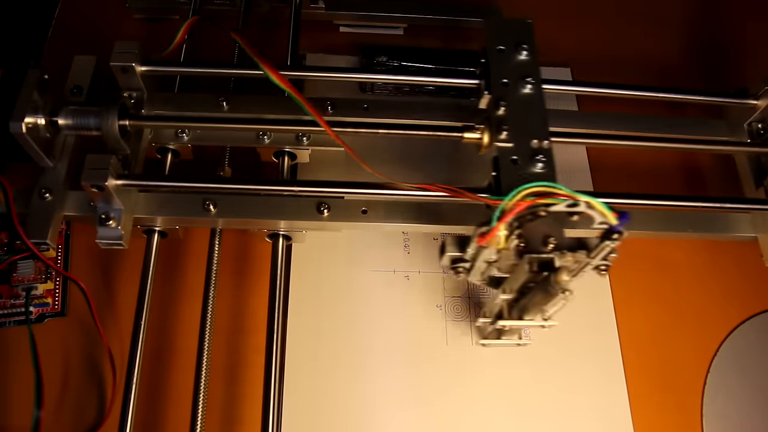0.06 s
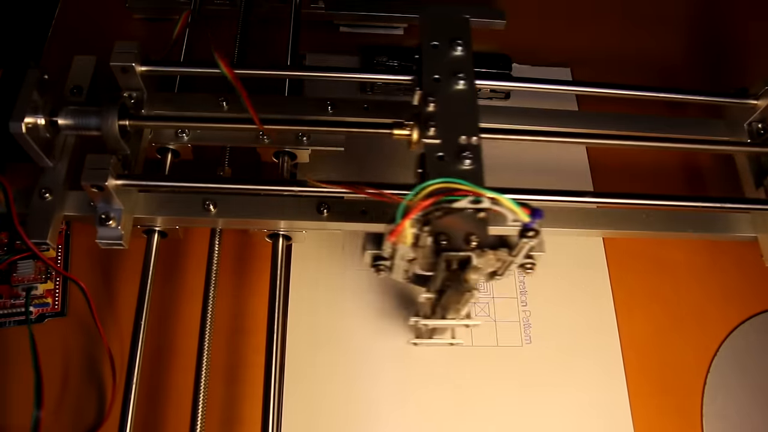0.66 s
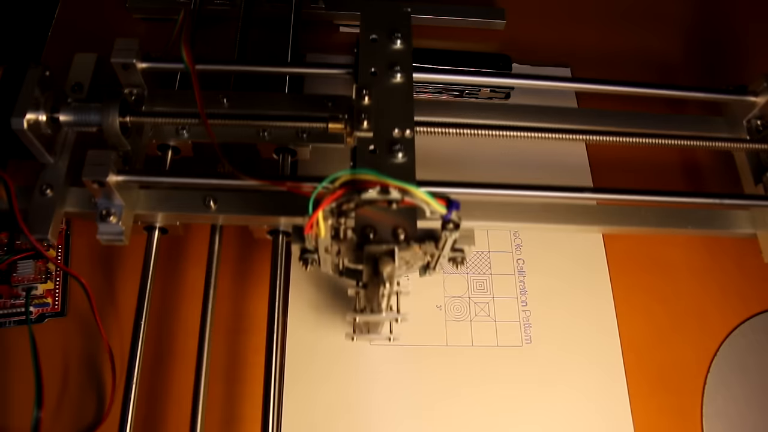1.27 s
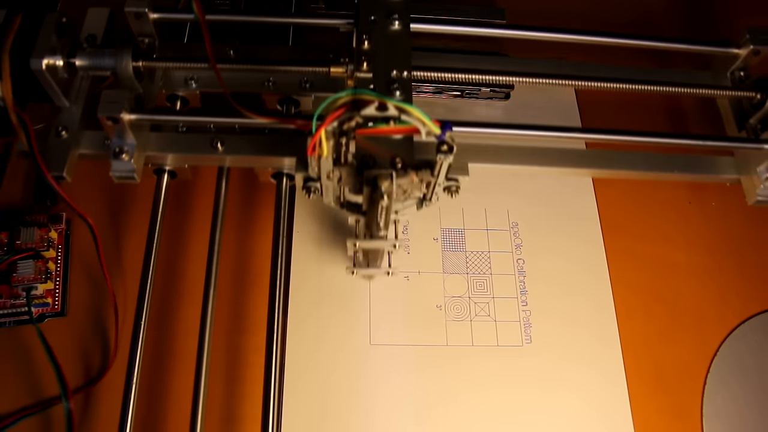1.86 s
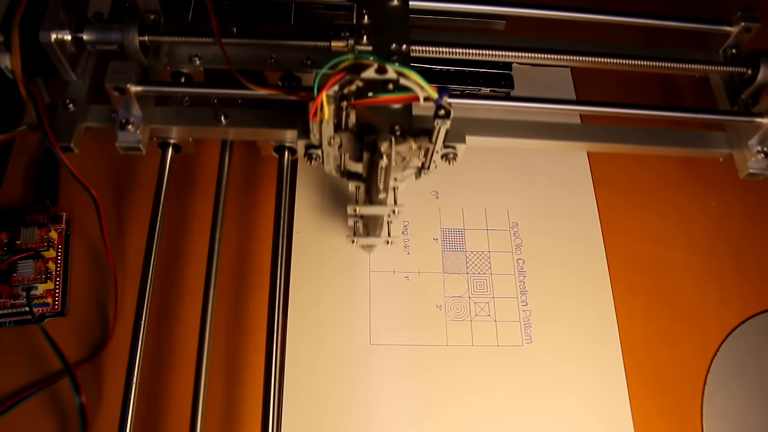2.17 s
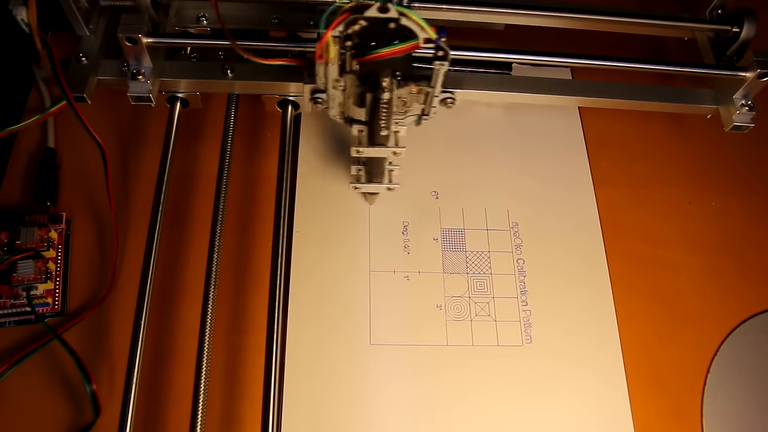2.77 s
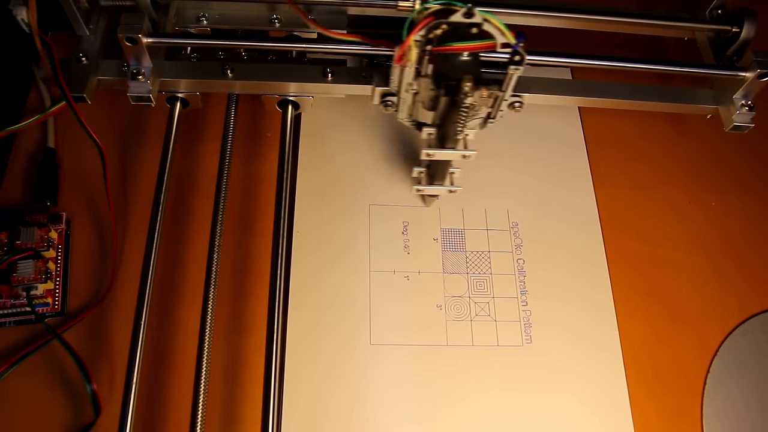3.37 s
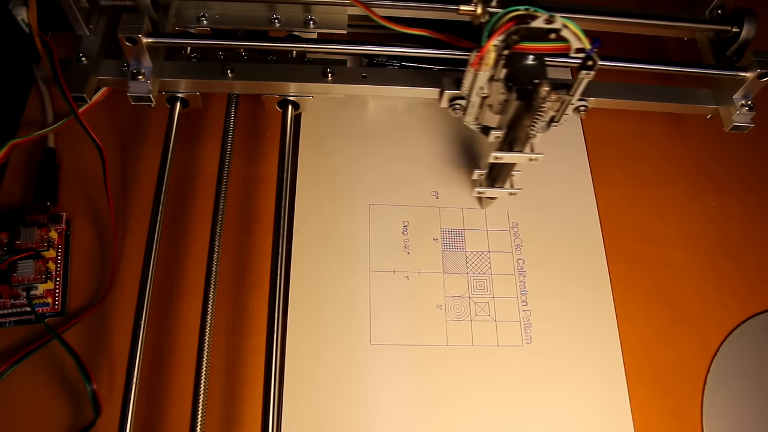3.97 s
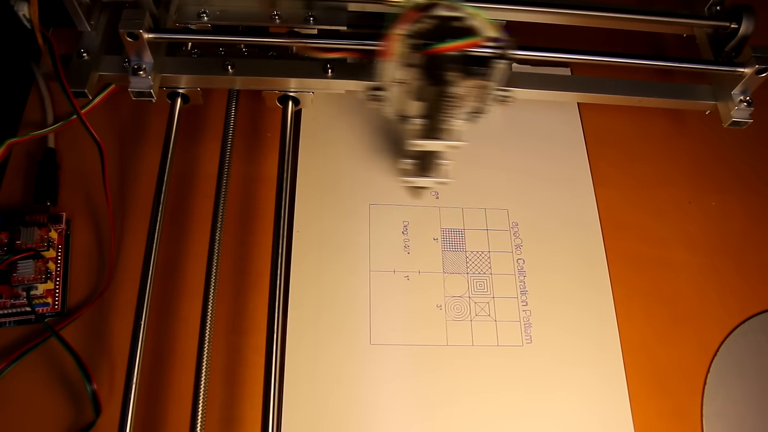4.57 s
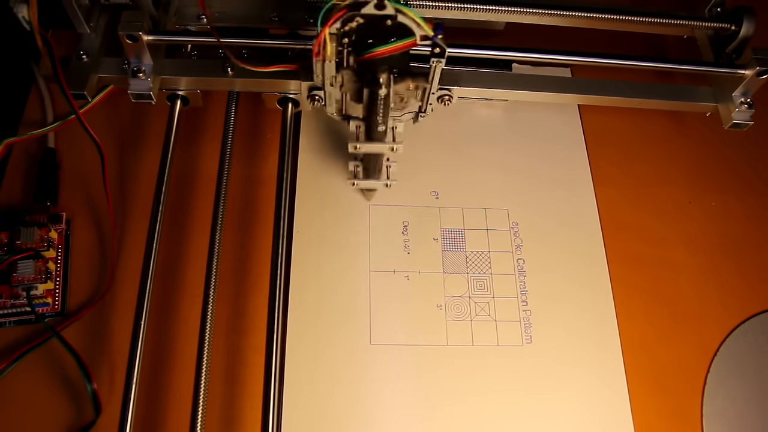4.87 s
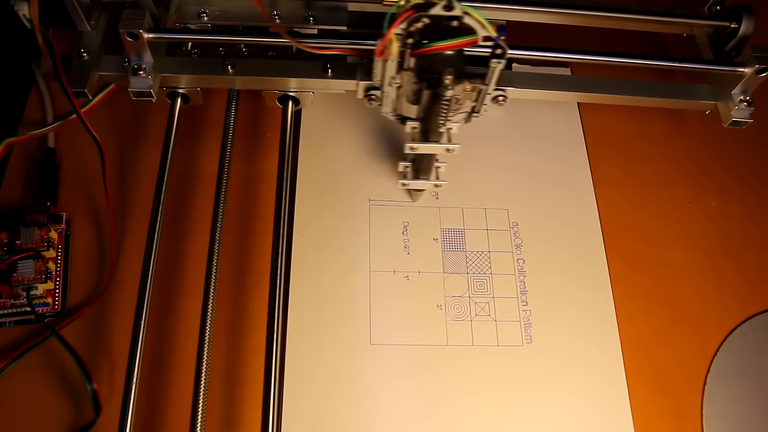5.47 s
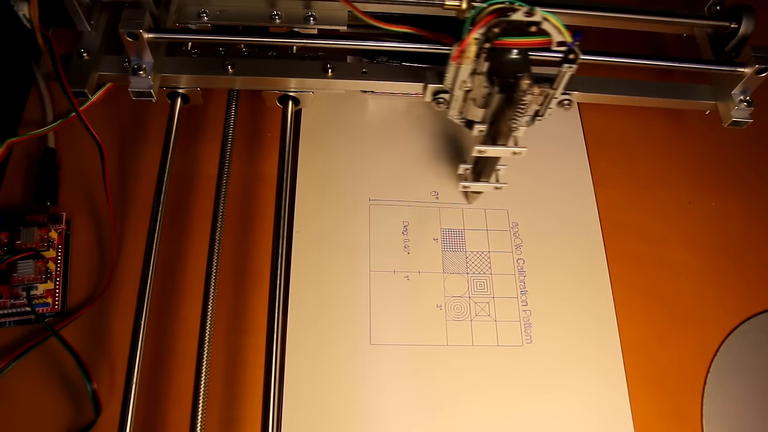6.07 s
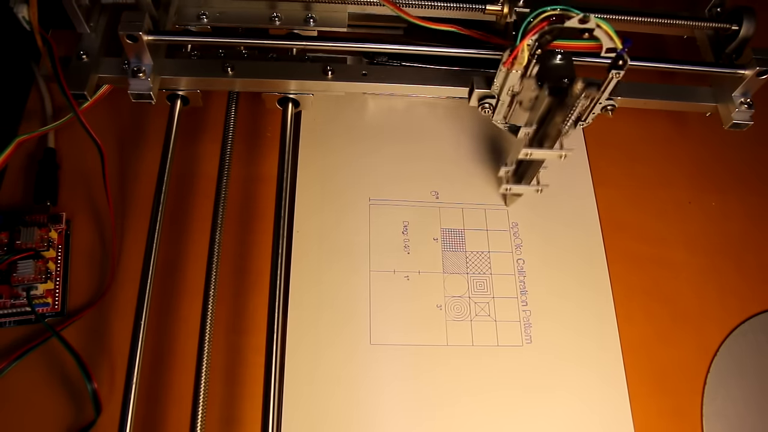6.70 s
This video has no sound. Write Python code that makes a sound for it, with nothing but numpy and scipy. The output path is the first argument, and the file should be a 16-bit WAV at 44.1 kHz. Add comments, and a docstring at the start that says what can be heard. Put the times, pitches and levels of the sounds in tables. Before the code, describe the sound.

Close up, the stepper motors of a small plotter on a bench whine through a series of moves. A fluttering carriage whine gives way to a duller screw chatter with a faint rising whistle. Another steady stroke leads into a fast, higher whirring run, short jogging blips and a final slow stroke. Starts and stops chirp and lightly rattle the frame, while a low hum and soft hiss continue underneath.

```python
"""A small pen plotter on a bench, microphone close and centred, over a low hum and steady hiss. A stepper
motor slides the carriage left, whining on multiples of its step rate and throbbing as its shaft turns.
At 1.3 s a second motor chatters along the lead screw under a faint rising whistle. The carriage goes
right at 2.8 s, races back at 4.4 s and goes right again at 5.1 s; tiny jogs and a nudge of the screw
follow these last two. Starts and stops sweep the frame's resonances; the carriage's also rattle it."""
import sys
import numpy as np
from scipy.fft import rfft, irfft, next_fast_len
from scipy.io import wavfile
from scipy.ndimage import uniform_filter1d

SR = 44100
rng = np.random.default_rng(int(sys.argv[2]) if len(sys.argv) > 2 else 0)


def wav_out(sig):
    """Save sig, one row per channel (or a flat mono array), as 16-bit PCM at SR to the path in sys.argv[1]."""
    wavfile.write(sys.argv[1], SR, np.round(np.clip(np.atleast_2d(sig).T, -1, 1) * 32767).astype(np.int16))


N = 297234
T = np.arange(N) / SR

STEP_HZ, RAPID_HZ, RAPID_RAMP_S = 398.26, 1593.0, 0.091
STEPS_PER_THROB, TOP_HZ = 50, 15850
# carriage moves, in turn left, right, rapid left, right: (start [s], stop [s])
STROKES = [(-.1, 1.303), (2.811, 4.331), (4.361, 4.827), (5.054, 6.576)]
# sliding friction of a slow move: (frequency [Hz], relative density [dB])
SLIDING = [(100, -120), (300, -104), (800, -99.5), (1200, -94), (2200, -104), (4000, -108), (8000, -107),
           (11000, -113), (15000, -115)]


def amp(db):
    return 10 ** (np.asarray(db) / 20)


def unit(x):
    return x / np.sqrt(np.mean(np.abs(x) ** 2) + 1e-20)


def along(points, hz):
    """Read (frequency [Hz], value) points on a log frequency axis."""
    freqs, values = np.transpose(points)
    return np.interp(np.log(hz + 1), np.log(freqs), values)


def filtered(x, response):
    """Shape x by a frequency response."""
    size = next_fast_len(N + SR // 4)
    return irfft(rfft(x, size) * response(np.fft.rfftfreq(size, 1 / SR)), size)[..., :N]


def noise(spectrum):
    """Noise that follows (frequency [Hz], density [dB/Hz]) points."""
    return filtered(rng.standard_normal(N) * np.sqrt(SR / 2), lambda hz: amp(along(spectrum, hz)))


def waver(t, width_hz, steep, size=2048):
    """A complex random curve of rms about 1 whose spectrum falls off beyond width_hz."""
    hz = np.fft.fftfreq(size, 2 / size)
    white = rng.standard_normal(size) + 1j * rng.standard_normal(size)
    curve = np.fft.ifft(np.fft.fft(white) / (1 + (hz / width_hz) ** 2) ** steep)
    return np.interp(t - t[0], np.arange(size) * 2 / size, unit(curve))


def swell(at, width_s):
    """A bell-shaped envelope around a moment."""
    return np.exp(-np.minimum(((T - at) / width_s) ** 2, 100) / 2)


def blip(at, hz, db, width_s):
    """A tone that swells and fades around a moment."""
    return np.sqrt(2) * amp(db) * swell(at, width_s) * np.sin(2 * np.pi * hz * (T - at))


def steady_hiss():
    """Steady centred hiss; the two channels differ only very faintly, mostly in the treble."""
    # both: (frequency [Hz], density [dB/Hz])
    centre = [(20, -95.5), (60, -100), (200, -101), (450, -96.5), (1200, -100), (2000, -106), (4000, -109),
              (9000, -110), (15000, -113)]
    side = [(100, -135), (400, -118), (4000, -117), (9000, -118), (15000, -122)]
    return noise(centre), noise(side)


def hum(hz=152.98, skip_s=1.844):
    """A pure, steady hum that skips once by part of a cycle."""
    cycles = hz * T + 0.45 * (T > skip_s)
    return amp(-43.7) * np.sin(2 * np.pi * cycles)


def carriage():
    """The first motor drives three slow strokes along the rail and one rapid run back."""
    # motor lines: (multiple of the step rate, relative level [dB], flutter [0-1])
    left_lines = [(1.0, -58, 0.8), (2.0, -61, 0.9), (2.5, -60, 0.7), (3.0, -73, 0.9), (3.5, -67, 0.8),
                  (4.5, -69, 0.9), (5.0, -73, 0.9), (5.5, -76, 0.9), (6.0, -67, 0.9), (7.0, -59, 0.3),
                  (7.5, -76, 0.9), (9.0, -69, 0.7), (10.0, -75, 0.9), (11.0, -73, 0.9), (12.0, -75, 0.9),
                  (13.0, -77, 0.9), (15.0, -67, 0.8), (15.5, -77, 0.9), (17.0, -74, 0.8), (19.0, -77, 0.9),
                  (20.0, -78, 0.9), (20.5, -79, 0.9), (21.0, -73, 0.9), (22.0, -70, 0.9), (23.0, -56, 0.7),
                  (24.0, -71, 0.8), (29.0, -78, 0.9), (30.0, -71, 0.8), (32.0, -57, 0.8)]
    right_lines = [(2.5, -63.0, 0.7), (3.0, -73.0, 0.9), (4.0, -67.0, 0.8), (4.5, -69.0, 0.8),
                   (7.5, -79.0, 0.9), (8.5, -78.0, 0.9), (9.5, -75.0, 1.0), (10.0, -77.0, 0.9),
                   (11.0, -78.0, 0.9), (17.0, -72.0, 0.8), (18.0, -76.0, 0.9), (19.0, -80.0, 0.9),
                   (20.0, -77.0, 0.9), (21.0, -76.0, 0.9), (22.0, -72.0, 0.9), (22.5, -73.0, 0.9),
                   (23.5, -78.0, 0.9), (24.0, -69.0, 0.8), (25.0, -80.0, 0.9), (29.0, -76.0, 0.6),
                   (30.0, -72.0, 0.5), (35.0, -80.0, 0.7), (36.0, -79.0, 0.7), (37.0, -79.0, 0.7)]
    rapid_lines = [(0.5, -54, 0.3), (1.5, -61, 0.8), (2.5, -65, 0.9), (3.5, -64, 0.7), (4.0, -54, 0.8),
                   (4.5, -69, 0.7), (5.0, -64, 0.8), (5.5, -76, 0.9), (6.0, -63, 0.6), (6.5, -72, 0.9),
                   (7.0, -75, 0.7), (7.5, -73, 0.9), (8.0, -69, 0.8), (8.5, -76, 0.8), (9.0, -76, 0.8)]
    # multiples of the step rate that swell along the rail
    left_orders = (4, 8, 14, 16)
    right_orders = (2, 3.5, 5, 6, 7, 8, 9, 13, 14, 15, 16, 23, 32)
    rapid_orders = (2, 3)
    # a row for each: (relative level [dB], flutter [0-1], swing [dB], peak after start [s], period [s])
    left_swells = [(-61.5, 0.48, 3.5, .39, .82), (-62.5, 0.34, 3, .06, 0.87), (-68, 1, 6, 0.65, 1.1),
                   (-51, 0.23, 1, 0.11, 0.95)]
    right_swells = [(-56.5, 0.81, 2.8, 0.53, 2.3), (-69, 0.91, 4.2, 0.12, 0.93),
                    (-63, 0.34, 3.3, 0.46, 0.87), (-74, .8, 4.6, 1.0, 1.5), (-67, 0.55, 3.8, 0.61, 1.32),
                    (-67, 0.55, 5.6, 0.19, 0.87), (-65.5, 0.61, 2.9, 0.95, 1.4), (-68.5, .7, 3, 1.32, 0.68),
                    (-62.5, 0.42, 2.1, .71, 0.68), (-63.5, 0.85, 3.5, 1.33, 1.06),
                    (-57, 0.59, 3.2, 0.78, .86), (-58, 0.67, 0.98, 1.38, 0.77),
                    (-58.5, 0.87, 2.7, 1.04, 1.16)]
    rapid_swells = [(-52.5, 0.32, 6.1, 0.17, 0.26), (-59, 0.86, 4, 0.08, 0.53)]
    # step tone of each rightward stroke: (relative level [dB], flutter [0-1])
    right_tones = [(-58.8, 0), (-54.5, 0.13)]
    # step tone of the rapid run: (time [s], relative level [dB])
    rapid_tone = [(4.455, -43.5), (4.503, -39), (4.551, -37.5), (4.735, -37.5)]
    # friction of the rapid run: (frequency [Hz], relative density [dB])
    whirr = [(100, -120), (450, -89.5), (900, -99), (1500, -93.5), (3000, -101), (8000, -104),
             (13000, -102), (15500, -105)]

    leftward, rightward, run_back, right_again = STROKES
    lines = left_lines + rail_swells(left_orders, left_swells, leftward[0])
    out = stepper(*leftward, STEP_HZ, lines, ramp_s=0.023, whine_db=0.2, roughness=1.45, chatter=0.11,
                  buzz_db=-85.5, sweep_db=-51, rub=SLIDING, rub_db=-1)
    for stroke, (db, flutter) in zip([rightward, right_again], right_tones):
        lines = right_lines + rail_swells(right_orders, right_swells, stroke[0]) + step_tone(db, flutter)
        out += stepper(*stroke, STEP_HZ, lines, ramp_s=0.024, whine_db=-0.37, roughness=1, chatter=0.11,
                       buzz_db=-96, sweep_db=-45.5, rub=SLIDING, rub_db=-1)
    lines = rapid_lines + rail_swells(rapid_orders, rapid_swells, run_back[0])
    lines += step_tone(np.interp(T, *np.transpose(rapid_tone)), flutter=0.13)
    return out + stepper(*run_back, RAPID_HZ, lines, ramp_s=RAPID_RAMP_S, whine_db=-0.25, roughness=1.6,
                         chatter=0.66, buzz_db=-94, sweep_db=-38.5, rub=whirr, rub_db=0.5)


def rail_swells(orders, rows, start):
    """Standing waves in the rails make these lines swell and fade as the carriage passes."""
    return [(order, db + swing_db * np.cos(2 * np.pi * (T - start - peak_s) / period_s), flutter)
            for order, (db, flutter, swing_db, peak_s, period_s) in zip(orders, rows)]


def step_tone(db, flutter):
    """The line at the step rate itself, at a set level or along a level curve."""
    return [(1, db + np.zeros(N), flutter)]


def stepper(start, stop, cruise_hz, lines, ramp_s, whine_db, roughness, chatter,
            buzz_db, sweep_db, rub, rub_db):
    """One move: the step rate ramps up, cruises and ramps down; friction noise follows the speed."""
    speed = np.clip(np.minimum(T - start, stop - T) / ramp_s, 0, 1)
    moving = speed > 0
    t, pace = T[moving], speed[moving]
    steps = np.cumsum(pace) * cruise_hz / SR
    shaft = 2 * np.pi * steps / STEPS_PER_THROB
    # the load makes the rotor lead and lag a little
    angle = 2 * np.pi * steps + 0.011 * np.sin(shaft) + 0.0094 * waver(t, 2.8, steep=1).real
    whine = motor_whine(moving, angle, shaft, cruise_hz, lines, roughness, chatter)
    sweep = frame_sweep(cruise_hz * pace, angle, way=np.sign(start + stop - 2 * t))
    out = amp(rub_db) * speed * noise(rub)
    buzz = microstep_buzz(angle / 2, cruise_hz / 2)
    out[moving] += pace ** 20 * (amp(whine_db) * whine + amp(buzz_db) * buzz)  # only near full speed
    out[moving] += amp(sweep_db) * pace ** 1.63 * np.sqrt(1 - pace ** 4) * sweep  # only on the ramps
    return out


def motor_whine(moving, angle, shaft, cruise_hz, lines, roughness, chatter):
    """Tones on multiples of the step rate that flutter, and throb as the shaft turns."""
    # flutter heard as roughness and as throb: (frequency [Hz], share)
    random_share = [(400, 0.53), (800, 0.46), (1400, 0.42), (2500, 0.68), (6000, 0.5), (13000, 0.39)]
    throb_share = [(400, 0.057), (2500, 0.04), (5500, 0.33), (6400, 0.51), (9000, 0.44), (13000, 0.47)]
    # a chattering drive shakes the frame's middle range most: (frequency [Hz], share)
    chatter_share = [(400, 0.09), (600, 0.67), (1000, 0.65), (3000, 0.59), (13000, .5)]
    # sudden phase slips: (frequency [Hz], size at full flutter [rad])
    slip_size = [(400, 2.65), (800, 2.27), (1400, 0.89), (3000, 0.58), (13000, 0.3)]
    # the rail rings differently as the carriage moves on: (frequency [Hz], scale of level drift [dB])
    drift = [(800, -2.65), (1400, 5.5), (4000, -2), (7000, 8.5), (9000, -0.5), (13000, 6.5)]
    t = T[moving]
    whine = np.zeros(len(t))
    for order, db, flutter in lines:
        hz = order * cruise_hz
        lag = rng.uniform(0, 2 * np.pi, 3)
        depth = flutter * max(along(throb_share, hz), chatter * along(chatter_share, hz))
        throb = 1 + depth * (np.cos(shaft + lag[0]) + 0.9 * np.cos(2 * shaft + lag[1]))
        rough = np.clip(roughness * flutter * along(random_share, hz), 0, 0.95)
        slipping = phase_slips(t, flutter * along(slip_size, hz))
        wobble = np.sqrt(1 - rough ** 2) * slipping + rough * waver(t, 33, steep=1)
        if np.ndim(db):  # the line brings its own level curve
            level = amp(db[moving])
        else:
            level = amp(db) * unit(amp(along(drift, hz) * waver(t, 1.54, steep=2.4).real))
        tone = (wobble * np.exp(1j * (order * angle + lag[2]))).real
        whine += np.sqrt(2) * level * unit(throb) * tone
    return whine


def phase_slips(t, size_rad, per_second=11, ease_s=0.0039):
    """A phasor that jumps at random moments; the tone dips as each jump passes."""
    times = np.cumsum(rng.exponential(1 / per_second, 64))
    phase = np.cumsum(size_rad * rng.standard_normal(65))[np.searchsorted(times, t - t[0])]
    width = int(ease_s * SR)
    return unit(uniform_filter1d(uniform_filter1d(np.exp(1j * phase), width), width))


def microstep_buzz(angle, repeat_hz, size=4096):
    """Uneven microsteps repeat every two steps: a comb of weak lines."""
    count = int(TOP_HZ / repeat_hz)
    harmonics = rng.standard_normal(count) + 1j * rng.standard_normal(count)
    cycle = irfft(np.r_[0, harmonics], size) * size / 2
    return np.interp(angle / (2 * np.pi) % 1, np.arange(size) / size, cycle)


def frame_response(hz):
    """Complex response of the frame's resonances, alternating in sign."""
    # (frequency [Hz], width [Hz], gain [dB])
    modes = [(580, 350, -2), (1062, 230, 4), (1786, 350, 2.5), (2530, 64, 0.5), (3350, 180, -2),
             (3880, 570, -3.5), (5000, 350, -4)]
    return sum((-1) ** k * amp(db) * 1j * hz * width / (centre ** 2 - hz ** 2 + 1j * hz * width)
               for k, (centre, width, db) in enumerate(modes))


def frame_sweep(step_hz, angle, way):
    """Low lines sweep up (way 1) or down (-1); the frame answers late and rings louder on the way up."""
    ring_hz, ring_width_hz, lag_hz = 1040, 59, 44.4
    ring_db, push_db = 7, 1
    sweep = 0
    for order in (0.5, 1, 2, 3):
        late_hz = order * step_hz - way * lag_hz
        nearness = np.exp(-np.minimum(((late_hz - ring_hz) / ring_width_hz) ** 2, 100) / 2)
        answer = frame_response(late_hz) * amp(nearness * (ring_db + way * push_db))
        sweep += (answer * np.exp(1j * order * angle)).real / np.sqrt(max(order, 1))
    return sweep


def rattles():
    """The carriage's changes of speed shake the frame and the loose pen holder."""
    # the rattle's bright fizz: (frequency [Hz], relative density [dB])
    fizz_spectrum = [(300, -20), (2000, -3.5), (4000, -3.5), (7000, -0.5), (12000, -3), (15500, -8)]
    jolt_inset_s, jolt_s, rattle_s, rattle_speed_share = 0.011, 0.012, 0.0043, 0.83
    moving = uniform_filter1d(sum((T > start) * (T < stop) * 1.0 for start, stop in STROKES), size=128)
    jolts = sum(swell(start + jolt_inset_s, jolt_s) + swell(stop - jolt_inset_s, jolt_s)
                for start, stop in STROKES)
    # the rapid run rattles throughout its ramps, hardest near one speed, more so when speeding up
    start, stop = STROKES[2]
    from_rest = np.minimum(T - start, stop - T)
    ramps = amp(-56) * (from_rest > 0) * (from_rest < RAPID_RAMP_S)
    up = swell(start + rattle_speed_share * RAPID_RAMP_S, rattle_s)
    down = swell(stop - rattle_speed_share * RAPID_RAMP_S, rattle_s)
    body_level = np.hypot(ramps, amp(-51.5) * jolts + amp(-45) * (up + down))
    fizz_level = np.hypot(ramps, amp(-56) * jolts + amp(-37) * up + amp(-46.5) * down)
    body = unit(filtered(rng.standard_normal(N), frame_response))
    return moving * (body_level * body + fizz_level * unit(noise(fizz_spectrum)))


def lead_screw():
    """The second motor: one long, duller, chattering move, then two nudges."""
    # motor lines: (multiple of the step rate, relative level [dB], flutter [0-1])
    screw_lines = [(2.0, -72.0, 1.0), (2.5, -63.0, 0.8), (15.0, -81.0, 0.9), (15.5, -83.0, 1.0),
                   (16.5, -84.0, 0.9), (23.0, -77.0, 0.9), (23.5, -85.0, 0.9), (31.0, -80.0, 0.9),
                   (32.0, -65.0, 0.8), (34.5, -80.0, 0.9)]
    # multiples of the step rate that swell during the long move
    orders = (1, 1.5, 3, 16, 33)
    # a row for each: (relative level [dB], flutter [0-1], swing [dB], peak after start [s], period [s])
    swells = [(-57.5, 0.88, .5, 1.2, 2), (-65.5, 1, 3.1, 1.1, 1.6), (-66.5, 0.77, 7.4, 0.31, 2.7),
              (-65.5, 0.63, 0.48, 0.36, 2), (-68, 1, 5.5, .46, 2.1)]
    travel, *nudges = [(1.293, 2.815), (4.868, 4.935), (6.695, 6.9)]  # (start [s], stop [s])
    moves = [(travel, screw_lines + rail_swells(orders, swells, travel[0]))]
    moves += [(nudge, screw_lines + step_tone(db=-56.5, flutter=1)) for nudge in nudges]
    return sum(stepper(*move, STEP_HZ, lines, ramp_s=0.022, whine_db=0.3, roughness=1, chatter=0.84,
                       buzz_db=-101, sweep_db=-48, rub=SLIDING, rub_db=-3) for move, lines in moves)


def whistle():
    """A faint, throbbing whistle climbs during the long screw move."""
    hz = np.interp(T, [1.4, 2.0, 2.7], [7700, 9050, 10400])
    throb = 1 + 0.68 * np.cos(2 * np.pi * T * STEP_HZ / STEPS_PER_THROB)
    return amp(-72) * throb * swell(2.2, 0.29) * np.sin(2 * np.pi * np.cumsum(hz) / SR)


def judders(width_s=0.0075):
    """The lead screw judders once in each move, on two half-step multiples."""
    # (time [s], level of the lower tone [dB])
    shakes = [(2.744, -57), (4.91, -49.5), (6.736, -49)]
    return sum(blip(at, 1.5 * STEP_HZ, db, width_s) + blip(at, 2.5 * STEP_HZ, db - 4, width_s)
               for at, db in shakes)


def bench_thuds():
    """The bench thuds softly after each rightward stroke."""
    return sum(blip(stop + 0.02, hz=45, db=-67.5, width_s=0.012) for _, stop in STROKES[1::2])


def undertone(hz=1416):
    """A brief tone just below the step rate joins the rapid run."""
    return amp(-53) * swell(4.66, 0.05) * np.sin(2 * np.pi * hz * T)


def jogs():
    """The motors jog a few steps while the carriage rests, each jog a short blip."""
    # (time [s], pitch [Hz], level [dB])
    blips = [(4.848, 517, -53), (4.959, 320, -49), (5.0, 438, -53), (5.038, 514, -53), (6.589, 328, -52),
             (6.601, 460, -56), (6.668, 510, -50), (6.675, 354, -49.5)]
    return sum(blip(at, hz, db, width_s=0.0036) for at, hz, db in blips)


def scene():
    """The plotter stands straight ahead of the microphone; left and right differ only very faintly, mostly in
    the treble."""
    plotter = carriage() + lead_screw() + rattles()
    plotter += whistle() + judders() + bench_thuds() + undertone() + jogs()
    hiss, side = steady_hiss()
    middle = plotter + hum() + hiss
    return np.array([middle + side, middle - side])


def record(dry):
    """The microphone passes nothing above its band limit."""
    return filtered(dry, lambda hz: hz < TOP_HZ)


dry = scene()
out = record(dry)
wav_out(out)
```